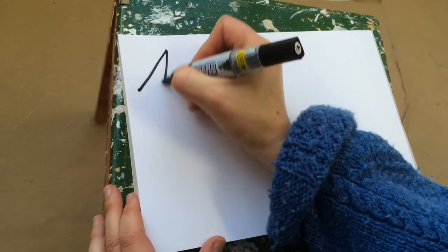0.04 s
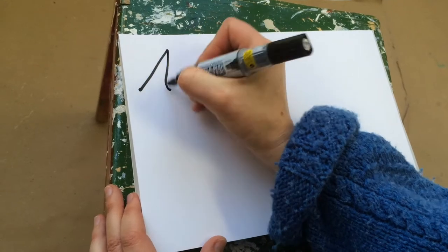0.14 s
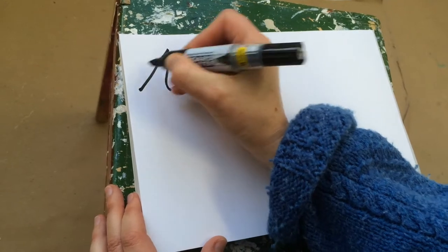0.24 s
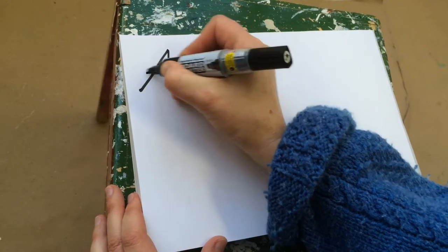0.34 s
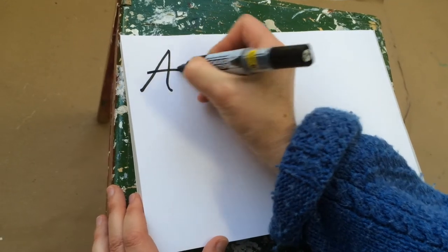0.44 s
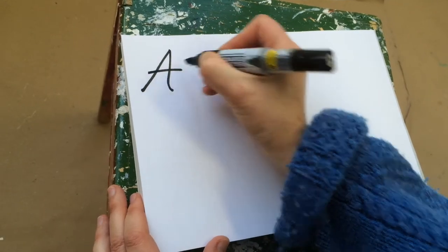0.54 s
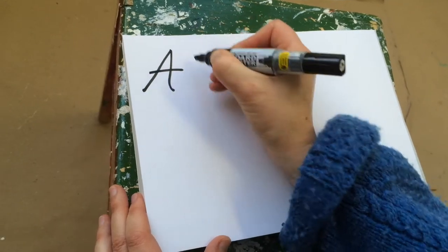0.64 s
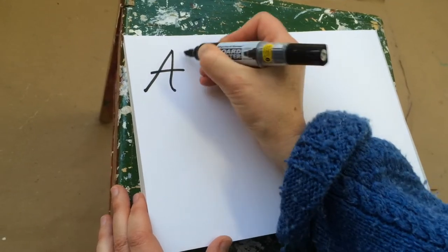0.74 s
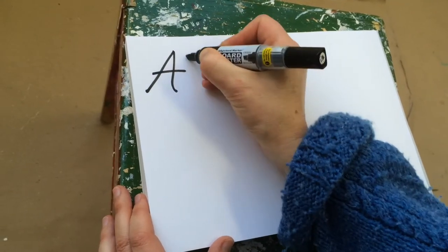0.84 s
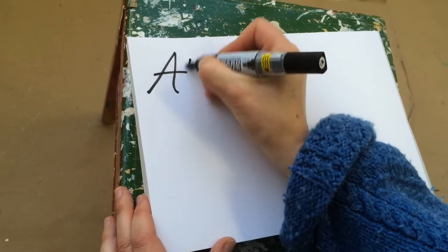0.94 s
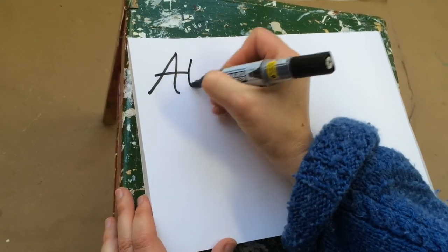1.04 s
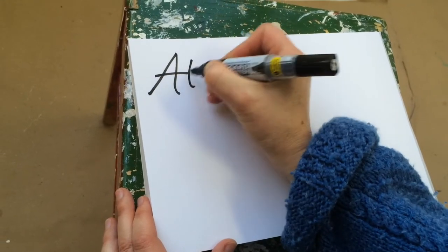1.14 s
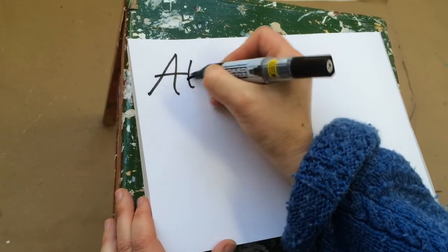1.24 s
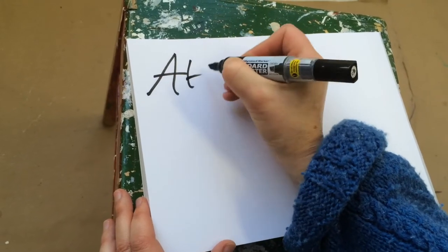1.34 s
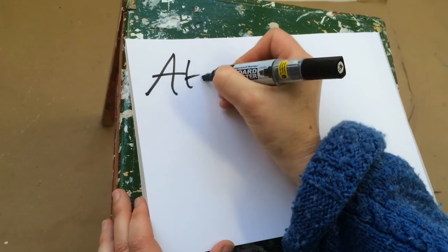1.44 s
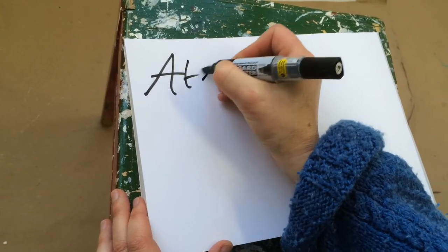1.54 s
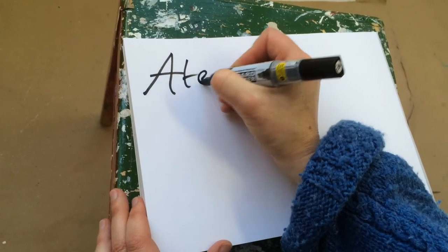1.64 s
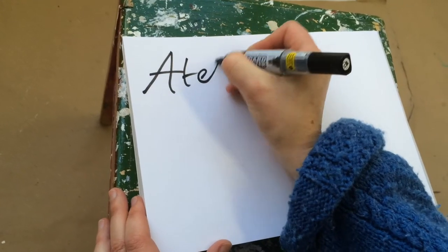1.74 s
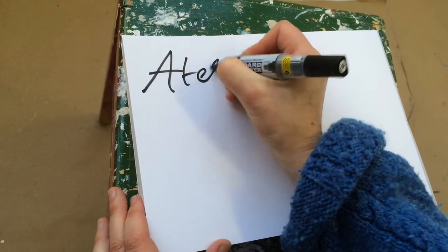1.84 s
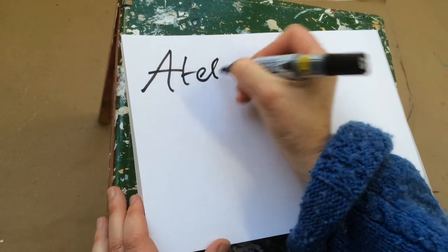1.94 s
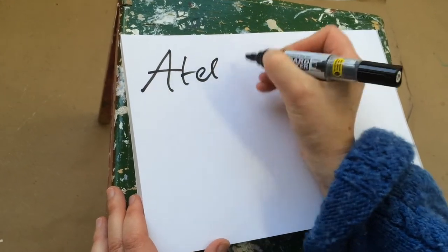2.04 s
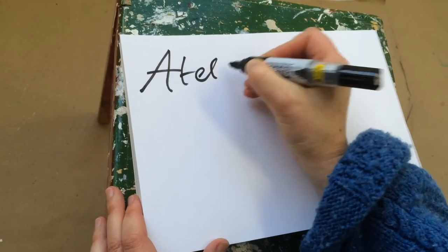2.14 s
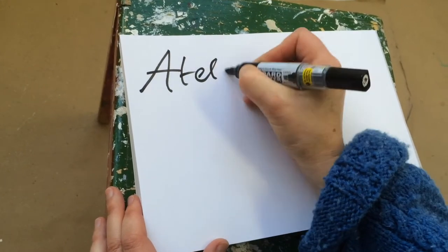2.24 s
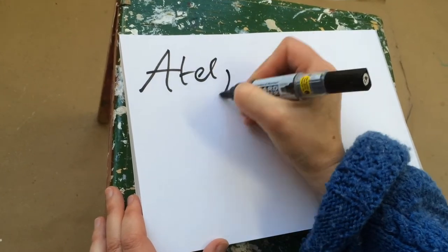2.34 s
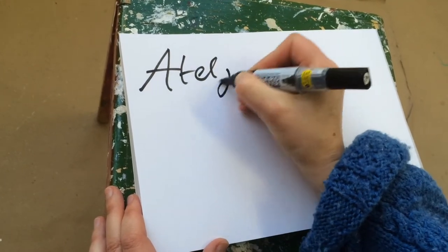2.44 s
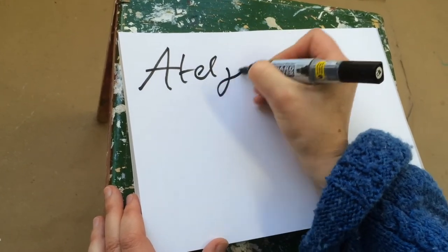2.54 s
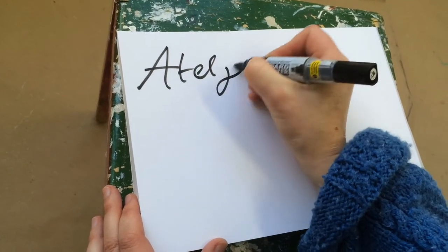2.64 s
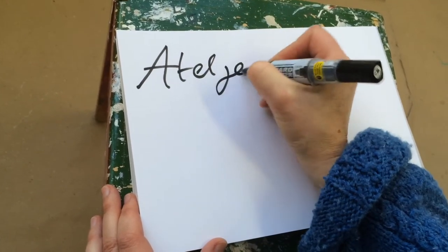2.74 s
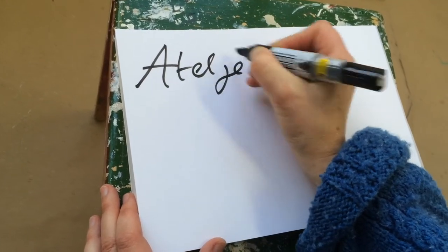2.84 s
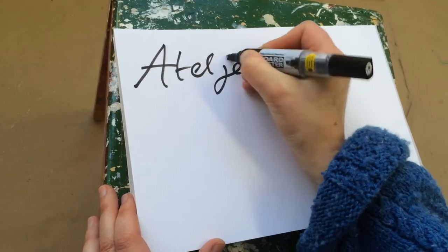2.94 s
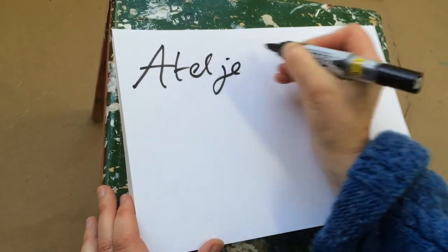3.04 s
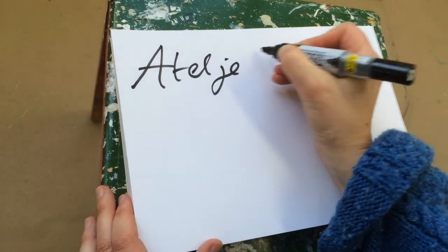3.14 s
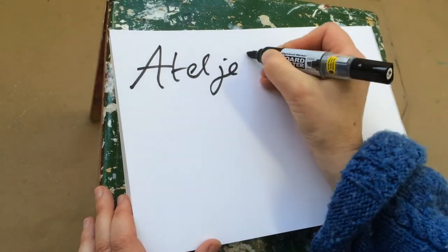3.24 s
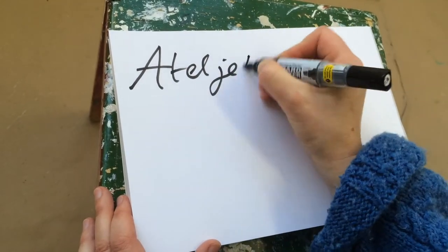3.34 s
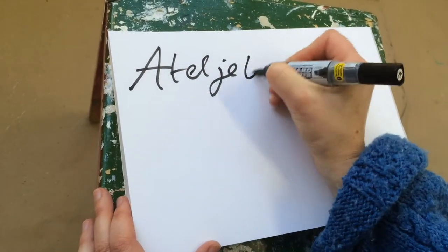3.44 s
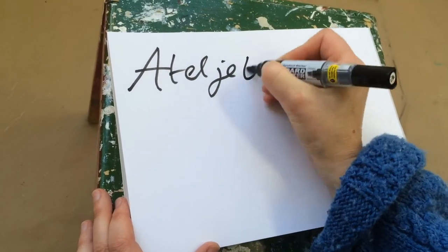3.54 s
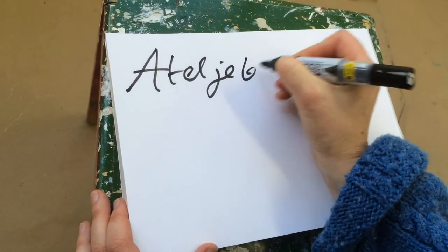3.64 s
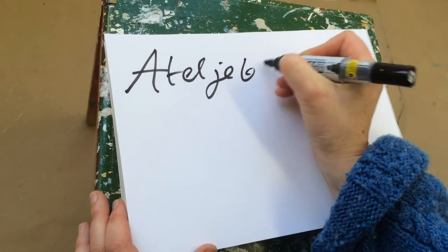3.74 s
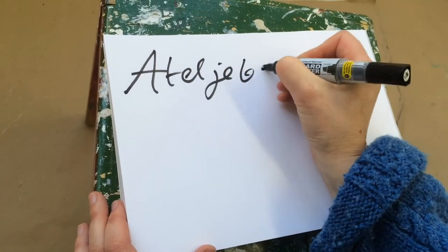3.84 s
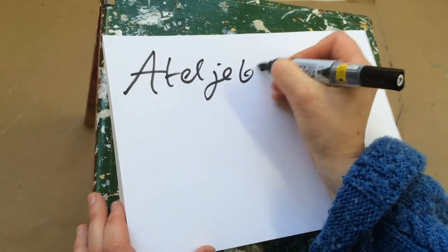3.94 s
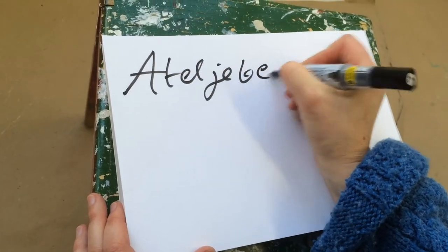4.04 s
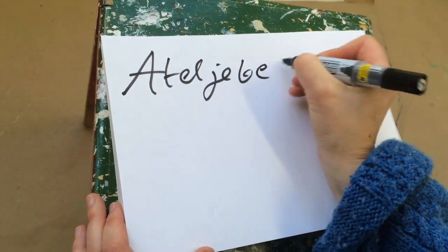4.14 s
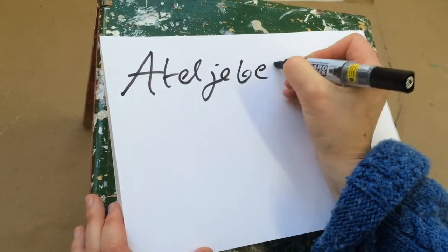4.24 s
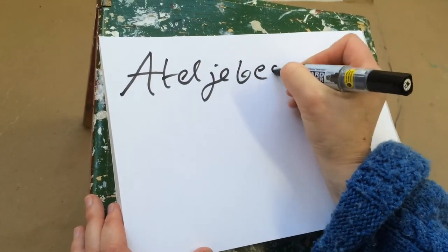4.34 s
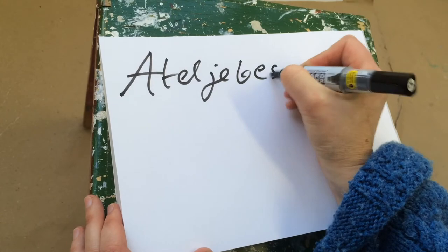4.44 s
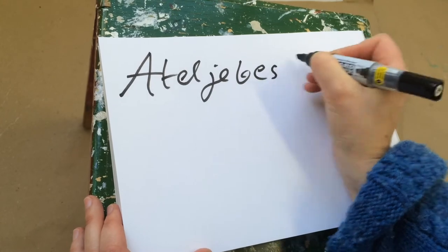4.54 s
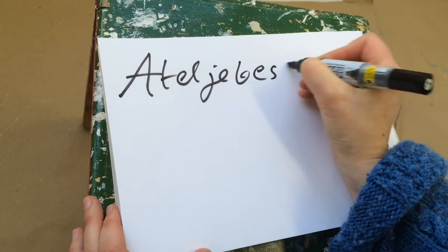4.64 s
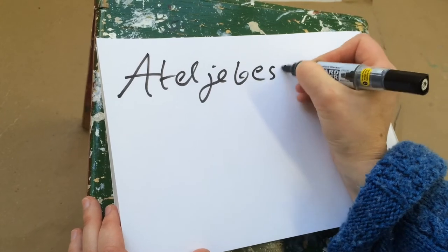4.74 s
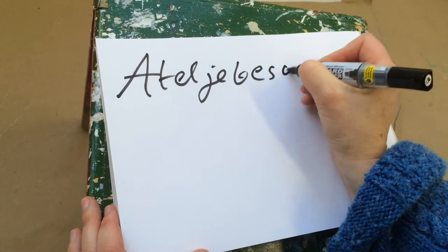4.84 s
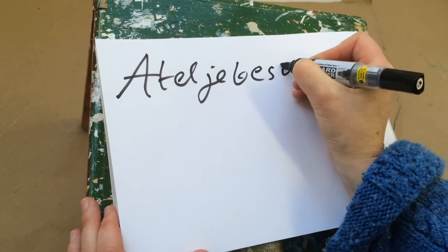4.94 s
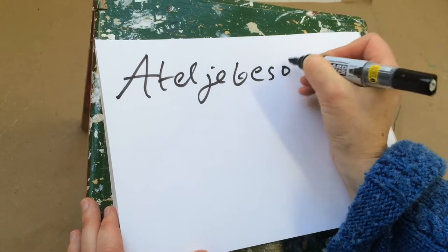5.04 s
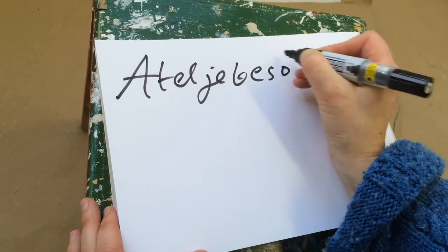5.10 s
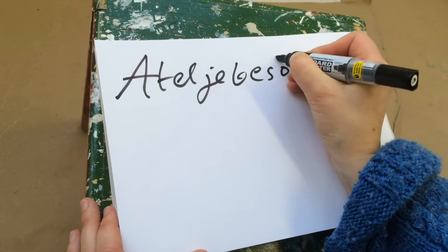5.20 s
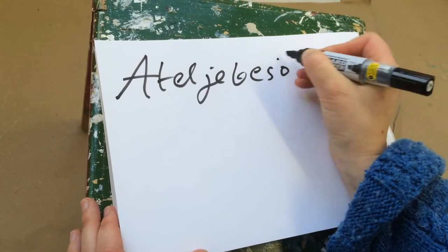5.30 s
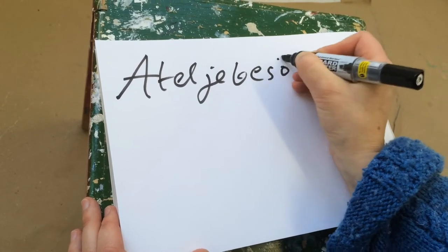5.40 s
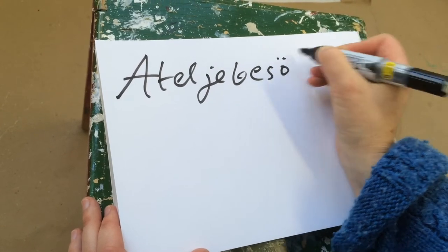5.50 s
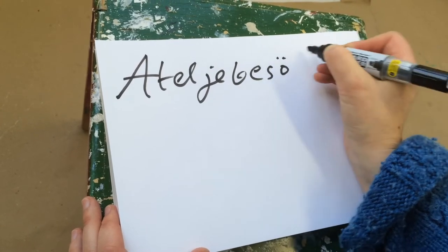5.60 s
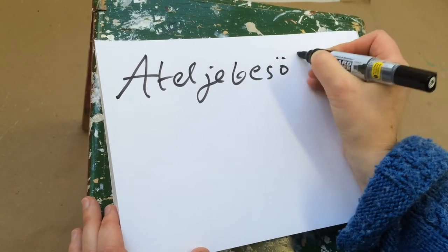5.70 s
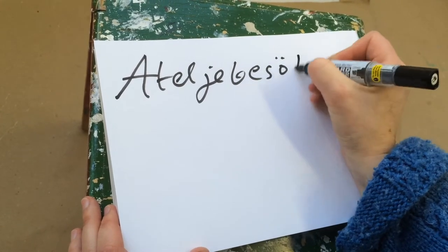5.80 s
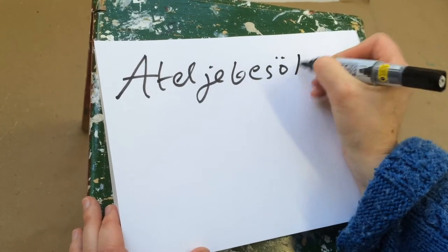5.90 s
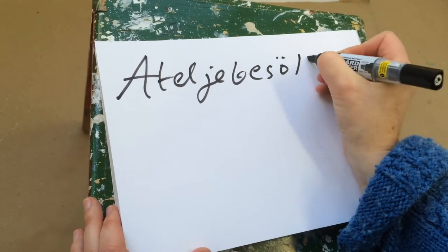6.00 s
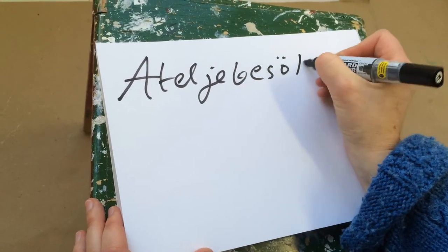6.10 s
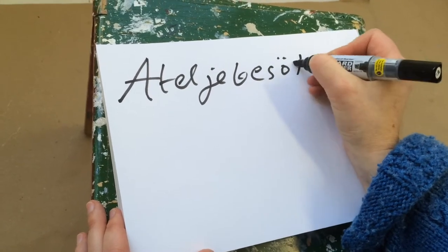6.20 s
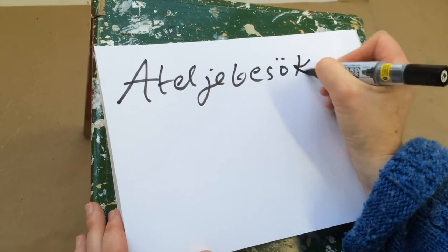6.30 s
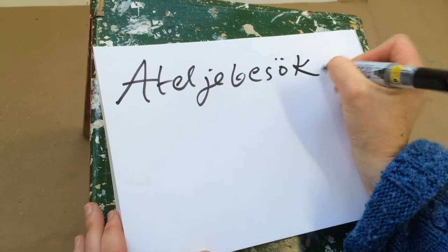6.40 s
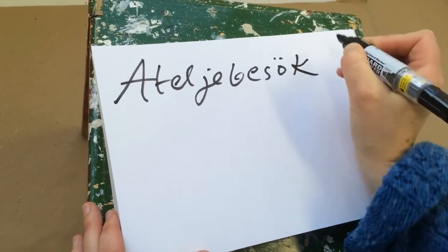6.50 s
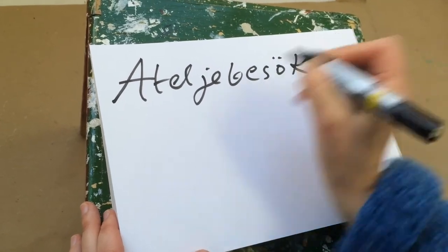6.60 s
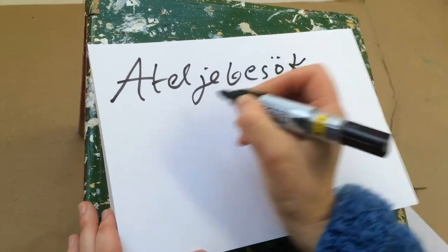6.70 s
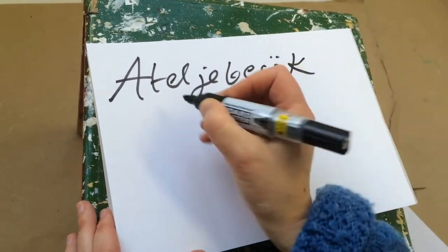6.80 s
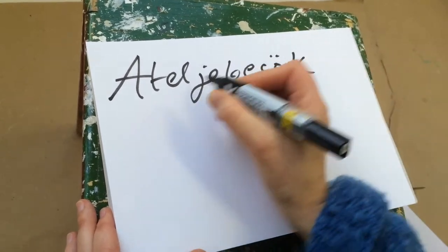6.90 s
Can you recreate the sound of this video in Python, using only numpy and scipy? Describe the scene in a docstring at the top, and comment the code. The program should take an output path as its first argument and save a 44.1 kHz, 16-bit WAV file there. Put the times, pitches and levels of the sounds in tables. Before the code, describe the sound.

Short, dry scratches of a marker writing on paper, mixed with hushed hand slides and dull knocks on the wood underneath.

```python
"""A quiet, bare room: a broad felt-tip marker writes large letters on paper lying on a wooden stool.
The felt catches on the paper's fibres and scratches in short strokes, juddering when slow and hissing
when fast. Landings of nib or hand knock on the wood, and the room booms softly after each knock.
Between letters the hand slides over the sheet with a hush; late on come a few light ticks of paper
and of the pen tip touching the sheet. Faint room tone with a low drone lies under it all."""
import sys
import numpy as np
from scipy import signal
from scipy.fft import rfft, irfft
from scipy.io import wavfile
from scipy.ndimage import uniform_filter1d

SR = 44100
rng = np.random.default_rng(int(sys.argv[2]) if len(sys.argv) > 2 else 0)


def file_out(sig):
    """Save sig as 16-bit WAV at sys.argv[1]."""
    # one column per channel
    cols = np.atleast_2d(sig).T
    # limit, then scale
    lim = np.clip(cols, -1, 1)
    pcm = np.round(lim * 32767).astype(np.int16)
    wavfile.write(sys.argv[1], SR, pcm)


N = 306936
TIME = np.arange(N) / SR
FREQS = np.maximum(np.fft.rfftfreq(N, 1 / SR), 1)


def from_db(db):
    """Decibels to gain."""
    return 10 ** (np.asarray(db) / 20)


def unit_rms(x):
    """Scale to unit power."""
    return x / np.sqrt(np.mean(x ** 2) + 1e-20)


def at_hz(points, hz, column=1):
    """Read a column of a table on a log-frequency axis."""
    table = np.array(points)
    return np.interp(np.log(hz), np.log(table[:, 0]), table[:, column])


def coloured(noise, eq_db):
    """Shape a steady noise with an EQ curve, at unit power."""
    return unit_rms(irfft(rfft(noise) * from_db(eq_db), N))


def drift(rate_hz):
    """A smooth random wobble with a spread of 1."""
    return unit_rms(irfft(rfft(rng.standard_normal(N)) / (1 + (FREQS / rate_hz) ** 2), N))


def bump(hz, centre_hz, width_hz):
    """The bell of a resonance, 1 at its centre."""
    return 1 / (1 + (2 * (hz - centre_hz) / width_hz) ** 2)


def room_tone(bed_db=-68.5, drone_db=-75):
    """A quiet bed of dark noise, with a narrow band of noise as a low, wavering drone."""
    # spectrum of the room's air: freq_hz, gain_db
    air_eq = [(25, -22), (40, -3), (60, -0.5), (115, -6), (200, -7.5), (350, -7.5), (480, -11.5),
              (630, -13.5), (1400, -16), (2500, -20.5), (3900, -22.5), (7000, -24.5), (15500, -27.5)]
    drone = coloured(rng.standard_normal(N), 20 * np.log10(bump(FREQS, centre_hz=75, width_hz=9)))
    bed = coloured(rng.standard_normal(N), at_hz(air_eq, FREQS))
    return from_db(bed_db) * bed + from_db(drone_db) * drone


def fibre_snaps(per_s=25000, spread_db=1.0):
    """Fibres catch and let go: dense snaps of uneven size."""
    snaps = rng.random(N) < per_s / SR
    return snaps * rng.standard_normal(N) * from_db(spread_db * rng.standard_normal(N))


def pen_speed_db(time_s, stroke):
    """The pen gathers speed to the fastest point of a sweep (0 dB), then slows into the turn or lift."""
    start_s, fastest_s, end_s, _, start_speed, end_speed = stroke[:6]
    position = np.interp(time_s, [start_s, fastest_s, end_s], [-1, 0, 1])
    slowest = np.clip(np.where(position < 0, start_speed, end_speed), .01, 1)
    swing = np.cos(position * np.pi / 2) ** 1.98
    return 20 * np.log10(slowest + (1 - slowest) * swing)


def nib_resonances_db(hz, lower_hz, lower_db, upper_hz, upper_db=5.5):
    """Felt, pen and sheet colour the scratch; the nib's angle brings out two more peaks per stroke."""
    # broad colour of felt on paper: freq_hz, gain_db
    felt_eq = [(150, -23), (400, -2.5), (700, -15.5), (1650, -11), (2100, -0.5), (4500, 1.5), (7000, -2.5),
               (10600, -1.5), (11700, -10), (15500, -12)]
    # resonances of pen and sheet: centre_hz, width_hz, gain_db
    pen_modes = [(1000, 130, 4), (1270, 300, 7), (1900, 160, 4), (2580, 250, 2), (3700, 500, 2),
                 (4200, 350, -4), (5120, 550, 4), (6000, 700, -2), (7800, 550, 3), (8450, 500, -3),
                 (9400, 800, 2)]
    angle_db = lower_db * bump(hz, lower_hz, width_hz=640) + upper_db * bump(hz, upper_hz, width_hz=4900)
    body_db = sum(gain_db * bump(hz, centre, width) for centre, width, gain_db in pen_modes)
    return at_hz(felt_eq, hz) + angle_db + body_db


def hand_reflection(hz, delay_ms, gain=-.17):
    """Power gain of a short bounce off the hand: a shallow comb filter."""
    return np.abs(1 + gain * np.exp(-2j * np.pi * hz * delay_ms / 1000)) ** 2


def nib_colour(hz, time_s, stroke, judder_hz=2000, hiss_hz=7000, sheet_db=7.5, ripple_db=3.0):
    """Gain by frequency and moment: a slow nib judders low, a fast one thins out and hisses."""
    judder_db, hiss_db, lower_hz, lower_db, upper_hz, delay_ms = stroke[6:]
    speed_db = pen_speed_db(time_s, stroke)
    lower_hz = lower_hz * from_db(.1 * speed_db)   # the lower peak sags as the pen slows
    judder_db = judder_db - .67 * speed_db   # judder and hiss are set against the mid friction band
    hiss_db = hiss_db + .54 * speed_db
    eq_db = nib_resonances_db(hz, lower_hz, lower_db, upper_hz)
    eq_db += .12 * hiss_db * np.log2(np.maximum(hz / hiss_hz, 1))   # the top tilts with the hiss
    # hard judder sets the sheet ringing
    eq_db += sheet_db * np.minimum(from_db(judder_db), 1) * bump(hz, centre_hz=1240, width_hz=320)
    # each spot of the sheet rings a little differently
    eq_db += ripple_db * unit_rms(uniform_filter1d(rng.standard_normal(hz.shape), size=3, axis=0))
    power = from_db(eq_db) ** 2 * hand_reflection(hz, delay_ms)
    low_cut_hz = 1594 * 2 ** (-.0438 * np.minimum(judder_db, 0))   # rises as the judder falls
    judder_band = 1 / (1 + (hz / judder_hz) ** 9)
    hiss_band = 1 / (1 + (hiss_hz / hz) ** 11)
    friction_band = (1 - hiss_band) / (1 + (low_cut_hz / hz) ** 9)
    mix = ((judder_band, judder_db), (friction_band, 0), (hiss_band, hiss_db))
    return np.sqrt(sum(from_db(db) ** 2 * band * power / np.mean(band * power, axis=0)
                       for band, db in mix))


def nib_scratch(strokes, frame=512, fade_s=.003, tooth_db=.43):
    """Felt catches on paper; the snaps sound through nib, pen and sheet, louder as the pen speeds up."""
    hz, frame_s, snaps = signal.stft(unit_rms(fibre_snaps()), SR, nperseg=frame)
    hz = np.maximum(hz, 1)[:, None]
    out = np.zeros(N)
    for stroke in strokes:
        start_s, _, end_s, level_db = stroke[:4]
        near = np.flatnonzero((frame_s > start_s - frame / SR) & (frame_s < end_s + 2 * frame / SR))
        spectrum = snaps[:, near] * nib_colour(hz, frame_s[near], stroke)
        scratch = signal.istft(spectrum, SR, nperseg=frame)[1]
        span = near[0] * frame // 2 + np.arange(len(scratch))
        t = TIME[span]
        contact = np.clip(np.minimum(t - start_s, end_s - t) / fade_s + .5, 0, 1)
        out[span] += scratch * contact * from_db(level_db + pen_speed_db(t, stroke))
    return out * from_db(tooth_db * drift(rate_hz=41))   # the paper's tooth makes the drag uneven


def nib_dabs(fastest_share=.29, start_speed=.25, end_speed=.15):
    """The nib dots, lands or digs in: each bite is a very short stroke."""
    # bites of the nib: start_s, length_s, level_db, judder_db, hiss_db
    bites = [(.008, 0.059, -66.5, 8, -16), (1.298, 0.02, -44, -11.5, -5), (1.864, .022, -44.5, -5, -16),
             (2.434, .043, -49.5, -4.5, -16), (3.021, .016, -51.5, -7, -1), (3.383, 0.015, -50, -12.5, -16),
             (4.257, .024, -54, 2, -6), (4.315, .029, -58.5, 7.5, -16), (4.712, .028, -52.5, 4, -4.5),
             (4.74, .02, -63.5, 7, -8), (4.778, 0.013, -48, -10, -18), (4.987, .021, -46.5, 1.5, -16),
             (5.045, 0.027, -54, -3.5, -1), (5.435, 0.014, -50.5, 4, -10.5),
             (5.49, 0.021, -56.5, -1.5, -1.5), (5.793, 0.025, -61.5, 2.5, -16),
             (6.122, 0.011, -52.5, -4.5, -16)]
    # nib resonances and hand bounce of every dab: lower_hz, lower_db, upper_hz, delay_ms
    dab_tone = (2900, 2.5, 9900, 0.414)
    return nib_scratch([(start_s, start_s + fastest_share * length_s, start_s + length_s, level_db,
                         start_speed, end_speed, judder_db, hiss_db, *dab_tone)
                        for start_s, length_s, level_db, judder_db, hiss_db in bites])


def letter_strokes():
    """The nib drags across the sheet, one sweep from each landing or turn to the next."""
    # sweeps of the pen, with levels and tone at full speed (a speed of 1): start_s, fastest_s, end_s,
    # level_db, start_speed, end_speed, judder_db, hiss_db, lower_hz, lower_db, upper_hz, delay_ms
    sweeps = [(.02, .09, .247, -47.5, .13, 0.13, -16, 2.5, 3300, 3, 12000, 0.3),
              (.43, .498, .565, -49, 0.42, .17, -14.5, -.5, 4000, 2.5, 9150, 0.39),
              (.997, 1.015, 1.138, -48.5, 0.9, 0.19, -15.5, 3, 3500, 6, 12000, .28),
              (1.298, 1.323, 1.36, -48.5, .1, 0.1, -15.5, 2, 6250, 1, 9200, .37),
              (1.514, 1.548, 1.595, -47.5, 0.15, 0.3, -13.5, -1.5, 3200, 4, 10100, .58),
              (1.595, 1.651, 1.7, -45.5, .25, .4, -11.5, -1, 2960, 3.5, 12200, 0.45),
              (1.7, 1.766, 1.81, -48.5, 0.54, 0.3, -13.5, 1.5, 4300, 10.5, 8800, 0.25),
              (1.81, 1.838, 1.86, -56.5, 0.84, .36, -7, 1.5, 3140, 9, 13900, .35),
              (1.864, 1.878, 2, -44.5, .32, 0.14, -13, 0.5, 3000, 4, 14500, .21),
              (2.32, 2.427, 2.49, -49.5, 0.48, .45, -10.5, 1.5, 3600, 0, 14100, 0.4),
              (2.49, 2.605, 2.63, -48, 0.55, .95, -15, 4, 5800, 8.5, 9100, 0.33),
              (2.63, 2.64, 2.685, -47, 0.9, 0.4, -10, -0.5, 3150, 9.5, 9000, 0.27),
              (2.685, 2.708, 2.77, -44, 0.36, 0.37, -9.5, -1, 4200, 6, 14500, .22),
              (2.77, 2.813, 2.83, -51, 1, 0.25, -8.5, -3, 3920, 4, 9900, .4),
              (3.385, 3.418, 3.47, -51.5, 0.62, 0.4, -13, 2.5, 3370, 4, 12000, .43),
              (3.47, 3.51, 3.572, -48.5, 0.23, 0.09, -14.5, 3.5, 4640, 7, 10300, .39),
              (3.572, 3.61, 3.652, -48, 0.08, 0.16, -13.5, .5, 4000, -1, 13000, 1),
              (3.652, 3.679, 3.695, -55, .46, 0, -8, -1.5, 3970, 4, 12900, 0.29),
              (3.9, 3.931, 3.98, -46, 0.24, 0.27, -10.5, -5, 3590, 1.5, 10500, 0.29),
              (3.98, 4.017, 4.07, -46.5, 0.42, .3, -10, -0.5, 2500, -2, 12100, .6),
              (4.07, 4.101, 4.135, -52, 0.87, 0.2, -10, 1, 5880, 5, 12100, 0.35),
              (4.316, 4.354, 4.455, -52.5, 0.33, 0.62, -4.5, -6, 2470, 1, 13600, 0.48),
              (4.455, 4.493, 4.497, -47.5, 0.18, 0.8, -8, -6.5, 2780, 7, 14700, .3),
              (4.779, 4.783, 4.85, -49, .29, .5, -9, -5.5, 2500, 1.5, 13200, 0.45),
              (4.85, 4.888, 4.935, -44.5, 0.18, .25, -9, -2, 4980, 1, 9800, .33),
              (4.935, 4.985, 5.005, -45.5, 0.5, .31, -5.5, -2.5, 2520, 4, 9400, 0.35),
              (5.793, 5.857, 5.935, -50, 0.38, 0.2, -10.5, -3, 5200, 7.5, 13400, 0.49),
              (6.125, 6.209, 6.285, -47.5, 0.77, 0, -9.5, -4, 5240, 4.5, 14500, .29),
              (6.285, 6.39, 6.451, -45.5, 0.16, 0.53, -11, -2, 4800, 3, 11200, 0.36)]
    return nib_scratch(sweeps)


def hand_slides(trim_db=-1.25, uneven_db=2.2):
    """The edge of the hand rubs the paper: a soft hush that swells and fades with each slide."""
    # slides between letters: middle_s, length_s, relative_db
    slides = [(.3, 0.24, -71), (0.66, 0.25, -66), (0.767, 0.1, -64), (1.441, 0.26, -71),
              (2.045, 0.36, -60.5), (2.836, .12, -71), (3.118, 0.23, -57.5), (3.232, 0.22, -72.5),
              (3.727, .14, -69.5), (4.146, 0.23, -61), (4.581, 0.27, -57.5), (5.601, 0.28, -60.5),
              (5.965, .15, -71.5), (6.504, 0.15, -61.5), (6.96, .06, -62.5)]
    # colour of skin on paper: freq_hz, gain_db
    skin_eq = [(410, -5.5), (700, -0.5), (968, 2), (1090, 4), (1710, 3), (3270, 0), (5150, -3), (6420, -1),
               (14700, -3), (15500, -7.5)]
    hush = coloured(fibre_snaps(), at_hz(skin_eq, FREQS))
    swell = sum(from_db(db) * np.cos(np.pi * np.clip((TIME - middle_s) / length_s, -.5, .5)) ** 2
                for middle_s, length_s, db in slides)
    return from_db(trim_db + uneven_db * drift(rate_hz=13)) * hush * swell


def ring(blows, pitch_hz, t60_s):
    """One mode of stool or room: a unit impulse starts a decaying sine of height 1."""
    decay = from_db(-60 / (t60_s * SR))
    angle = 2 * np.pi * pitch_hz / SR
    return signal.lfilter([0, np.sin(angle)], [1, -2 * decay * np.cos(angle), decay ** 2], blows + 1e-18)


def ticks(events):
    """Bright noise bursts that die quickly, one per (start_s, level_db, t60_s)."""
    # colour of a tick: freq_hz, gain_db
    tick_eq = [(500, -2), (2500, -1.5), (5000, -4), (9500, -5.5), (15000, -8)]
    envelope = sum((TIME >= start_s) * from_db(level_db - 60 * np.clip((TIME - start_s) / t60_s, 0, 2))
                   for start_s, level_db, t60_s in events)
    return envelope * coloured(rng.standard_normal(N), at_hz(tick_eq, FREQS))


def low_cut(x, cutoff_hz):
    """Roll off the bass at 12 dB per octave."""
    return signal.sosfilt(signal.butter(2, cutoff_hz, "high", fs=SR, output="sos"), x)


def stool_knocks(neutral_hardness_db=-8, tick_db=-27, tick_t60_s=.021, give_s=.00207):
    """Each landing rings the stool and the room's low modes and adds a faint tick; hard ones bring out the
    upper modes."""
    # landings of nib or hand: touch_s, strength_db, hardness_db
    landings = [(0.413, -43, -15), (1.256, -36, -22.5), (1.279, -36, -26), (2.253, -33, -15),
                (2.972, -26, -9.5), (3.297, -36.5, -18.5), (3.845, -36, -27.5), (4.262, -46.5, -24),
                (4.712, -44.5, -19.5), (5.219, -33, -7), (5.43, -32, -10.5), (5.741, -41, -7.5),
                (6.051, -54.5, -5.5)]
    # modes rung by a knock, the short ones of the wooden stool, the long, low ones of the room: pitch_hz,
    # gain_db, t60_s
    knock_modes = [(55.8, -25.5, 0.79), (73.74, -19, 0.56), (102.3, -2, 0.032), (173, -8, 0.049),
                   (184.3, -22.5, 0.9), (283, -9, 0.036), (358, -21.5, 0.61), (357.4, 0.5, 0.044),
                   (565, -6, 0.013), (716, -23, 0.074), (1250, -19.5, 0.029)]
    touch_s, strength_db, hardness_db = np.transpose(landings)
    hit_s = touch_s + give_s   # the felt gives way before the blow reaches the wood
    hit_samples = np.round(hit_s * SR).astype(int)
    wood = np.zeros(N)
    for k, (pitch_hz, gain_db, t60_s) in enumerate(knock_modes):
        upper_weight = np.clip(np.log(pitch_hz / 120) / np.log(2.5), 0, 1.3)
        blow_db = strength_db + gain_db + upper_weight * (hardness_db - neutral_hardness_db)
        blows = np.zeros(N)
        blows[hit_samples] = from_db(blow_db + rng.normal(0, 1, len(hit_s)))
        wood += (-1) ** k * ring(blows, pitch_hz, t60_s)
    wood = low_cut(wood, cutoff_hz=50)   # the knocks' deep bass is rolled off
    return wood + ticks([(s, db + tick_db, tick_t60_s) for s, db in zip(hit_s, strength_db)])


def paper_ticks():
    """Light ticks of the paper and of the pen tip touching the sheet."""
    # ticks on the sheet: start_s, level_db, t60_s
    touches = [(5.304, -58, 0.048), (6.786, -56, 0.012), (6.791, -56, 0.0072), (6.853, -58.5, 0.01),
               (6.923, -61, 0.097)]
    return ticks(touches)


def room_reverb(x, gap_s=.0029):
    """The bare room returns a diffuse tail, built in half-octave bands; the bass lasts longest."""
    # decay of the room, and its level against the direct sound: freq_hz, t60_s, wet_db
    decays = [(70, 1.5, -1.5), (166, 1.4, -1.5), (340, 0.65, -6), (710, 0.31, -5.5), (2100, 0.72, -13),
              (6140, 0.38, -20.5), (14000, 0.32, -19)]
    t, tail = TIME[:2 * SR], 0
    fade_in = np.clip(t / gap_s - 1, 0, 1)
    edges_hz = 45 * 2 ** (np.arange(18) / 2)
    for low, high in zip(edges_hz, edges_hz[1:]):
        centre_hz = np.sqrt(low * high)
        t60_s, wet_db = at_hz(decays, centre_hz), at_hz(decays, centre_hz, column=2)
        bandpass = signal.butter(2, [low, high], "band", fs=SR, output="sos")
        band = signal.sosfilt(bandpass, rng.standard_normal(len(t))) * from_db(-60 * t / t60_s) * fade_in
        to_unity = np.sqrt(2 * (high - low) / SR / np.sum(band ** 2))
        tail = tail + band * to_unity * from_db(wet_db)
    return signal.fftconvolve(x, tail)[:N]


def scene():
    """Pen, hand and stool, close by in the room, in mono."""
    writing = letter_strokes() + nib_dabs() + hand_slides() + stool_knocks() + paper_ticks()
    return (writing + room_reverb(writing) + room_tone())[None]


def record(dry):
    """The small microphone loses the deep bass; the top is cut steeply."""
    top_hz = 15550
    high_cut = signal.ellip(12, .1, 70, top_hz, fs=SR, output="sos")
    return signal.sosfilt(high_cut, low_cut(dry, cutoff_hz=29))


dry = scene()
out = record(dry)
file_out(out)
```